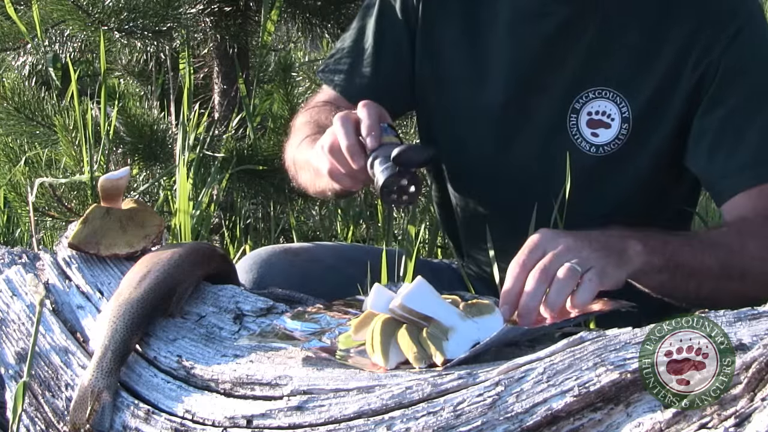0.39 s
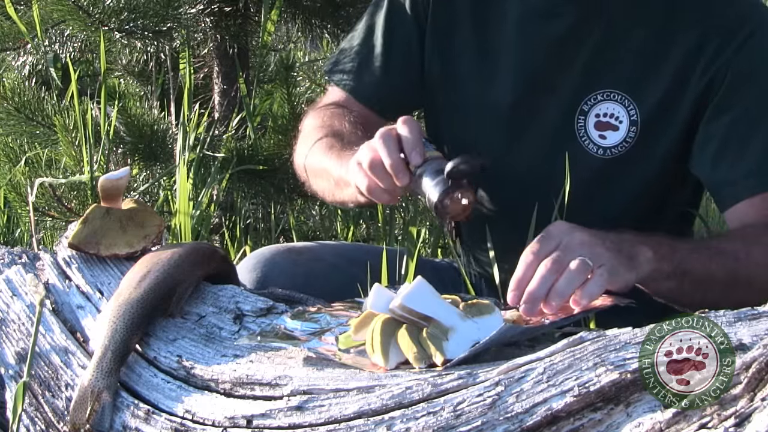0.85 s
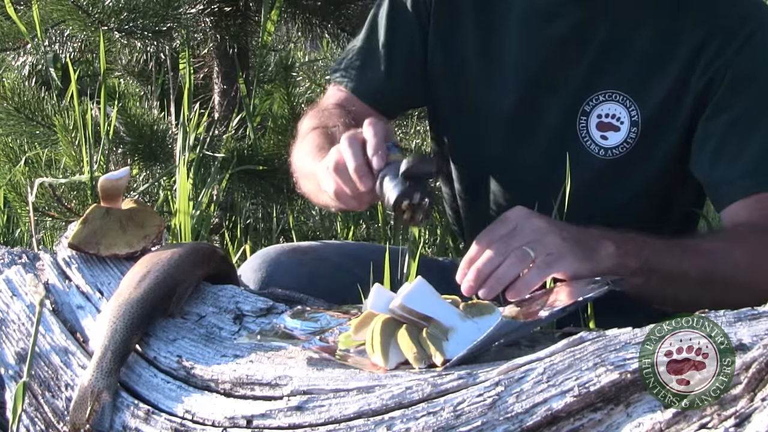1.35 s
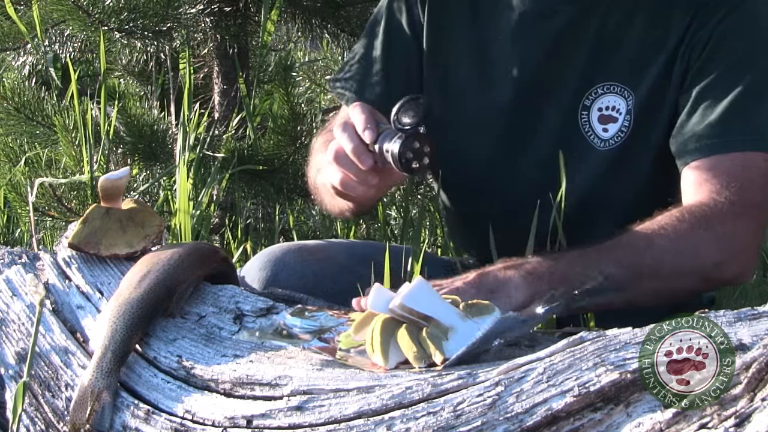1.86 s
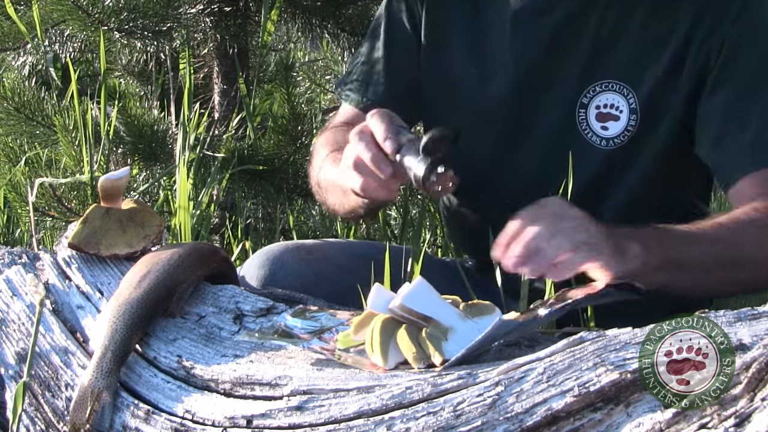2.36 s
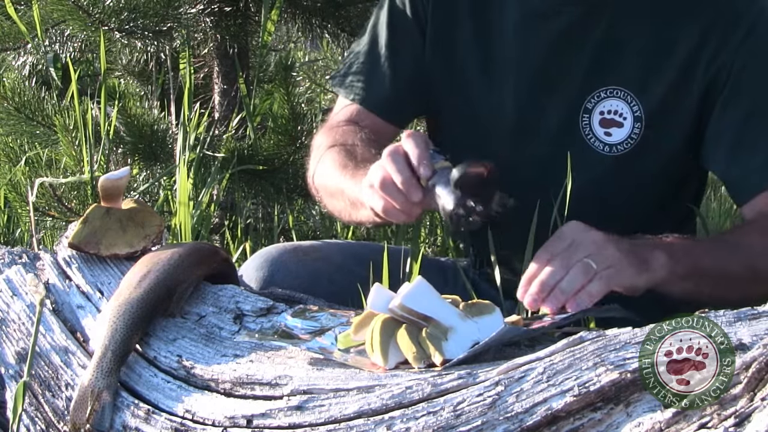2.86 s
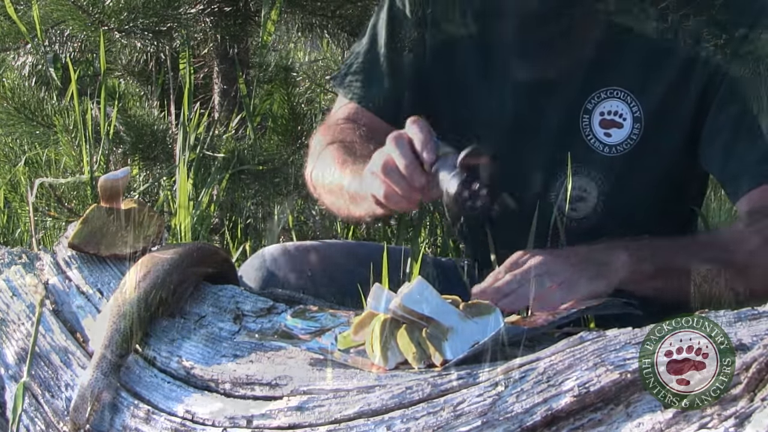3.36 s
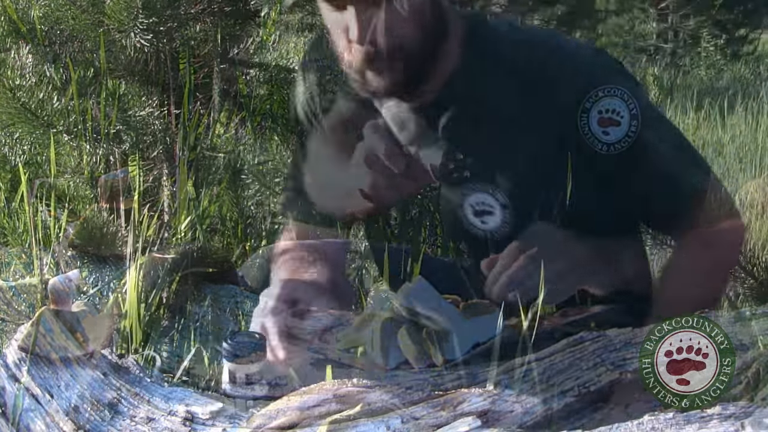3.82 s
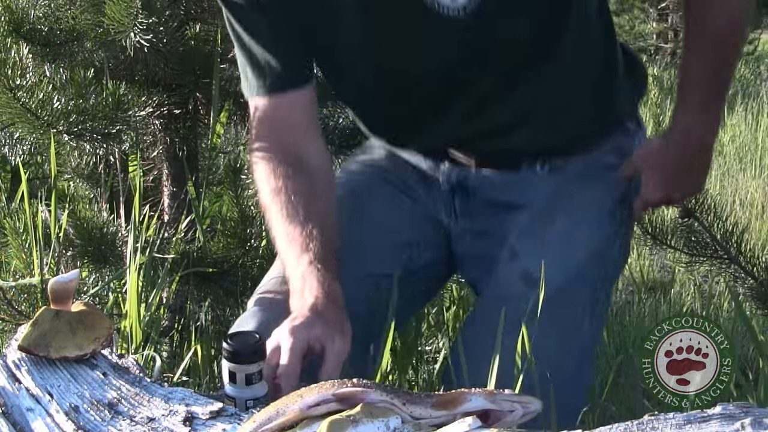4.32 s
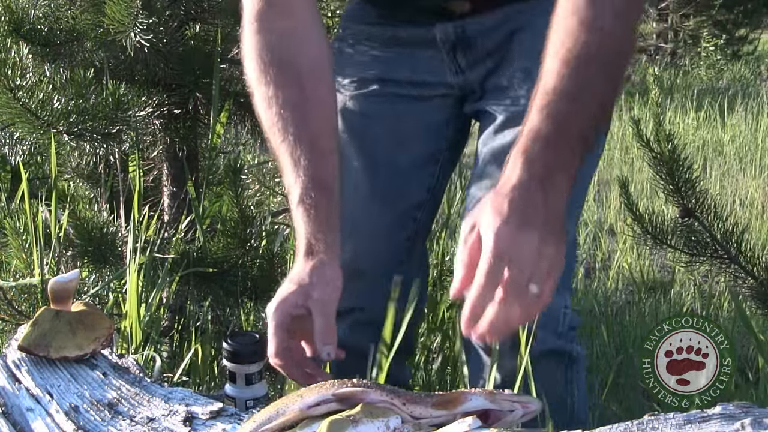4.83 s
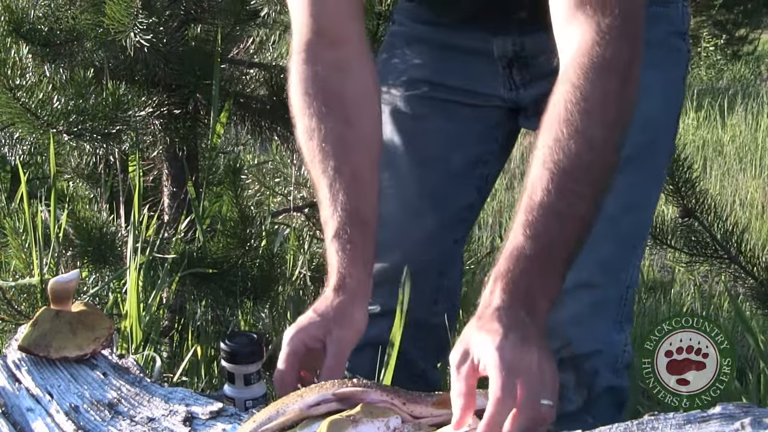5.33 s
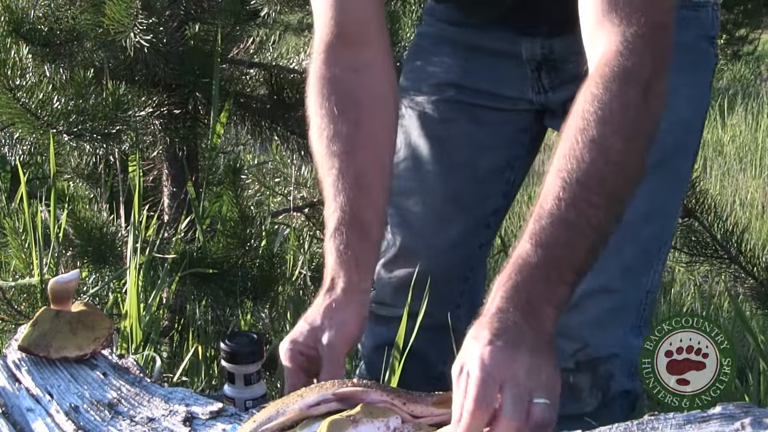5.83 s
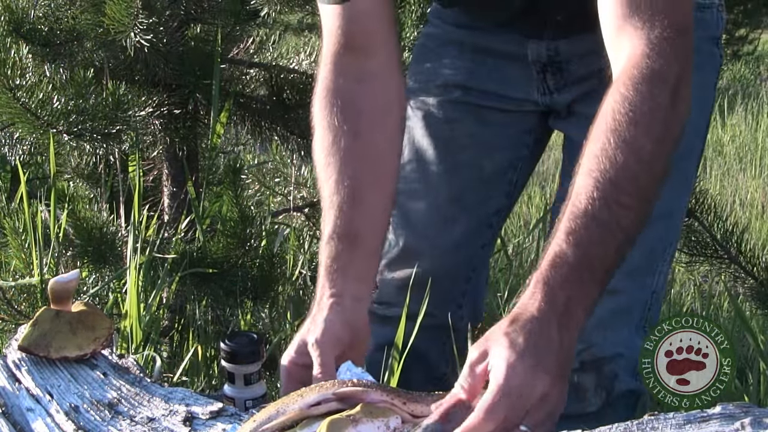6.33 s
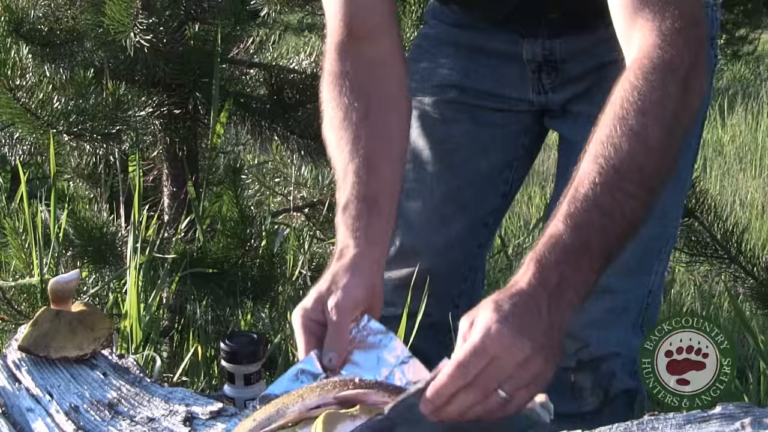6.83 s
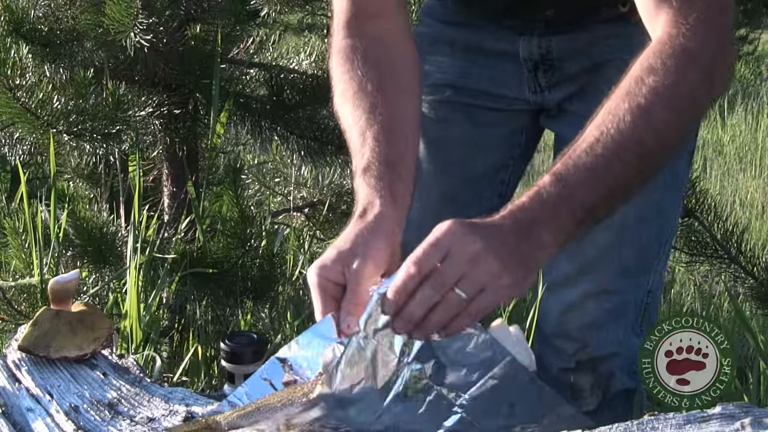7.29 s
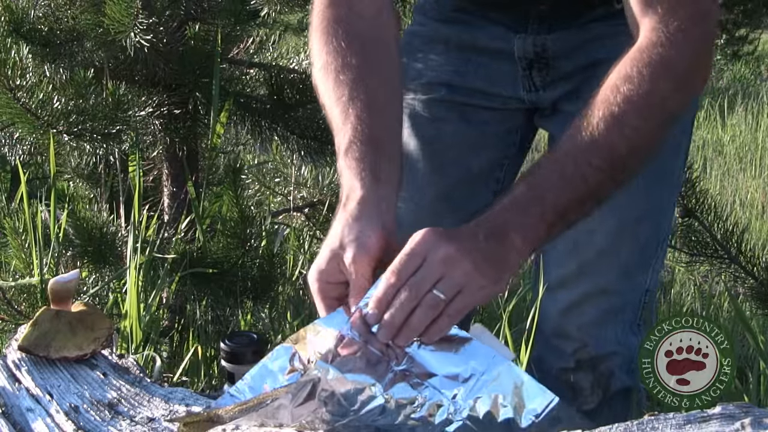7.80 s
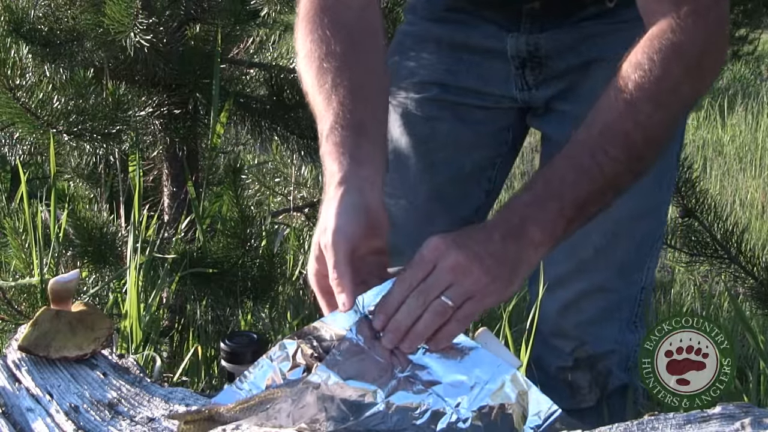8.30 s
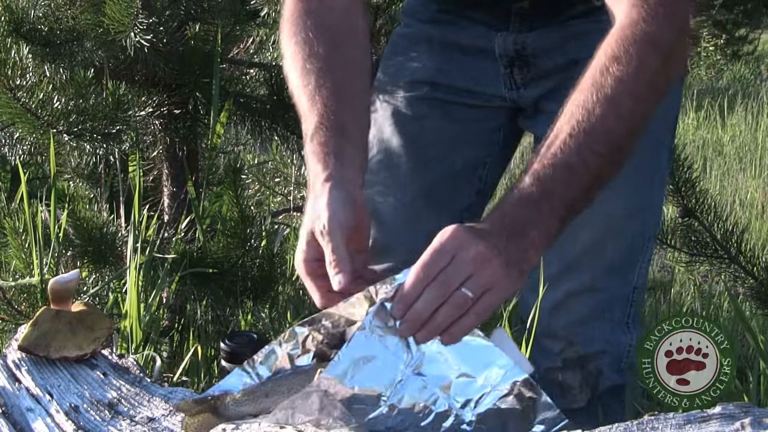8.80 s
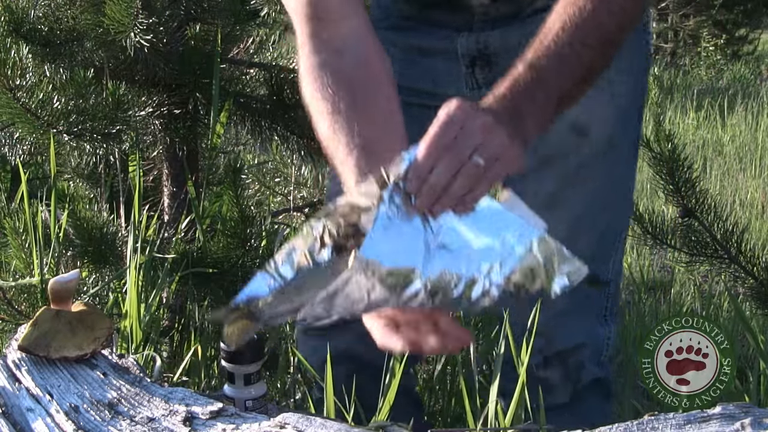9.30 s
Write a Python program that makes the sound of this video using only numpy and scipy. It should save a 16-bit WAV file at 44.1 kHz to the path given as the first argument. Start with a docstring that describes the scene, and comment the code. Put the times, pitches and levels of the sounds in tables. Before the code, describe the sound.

Bright foil crackle, a brief lull of scuffing feet and soft ground thuds, then denser, hollower foil crumpling, with a faint stream behind.

```python
"""Hands handle aluminium foil on a log outdoors: first the sheet lies flat, its creases snapping in bursts.
From about 3 s it turns gradually into a folded packet; someone gets up, steps round the log and lands softly.
Then the foil crackles on as a packet, with small pops, and after 7.7 s it sounds more like a hollow cavity.
The foil is noise shaped by many snaps, the pops and thuds are short rings, the scuffs are lumpy noise.
A stream hisses far off all along, and loud treble pushes soft low bumps out of the microphone input."""
import sys
import numpy as np
from scipy import signal
from scipy.fft import rfft, irfft, next_fast_len
from scipy.io import wavfile
from scipy.ndimage import uniform_filter1d, map_coordinates

SR = 44100
rng = np.random.default_rng(int(sys.argv[2]) if len(sys.argv) > 2 else 0)


def generate_wav(sig):
    """Save sig (samples, or channels by samples) to the path in sys.argv[1] as 16-bit PCM at SR."""
    pcm = np.round(np.clip(np.atleast_2d(sig).T, -1, 1) * 32767).astype(np.int16)
    wavfile.write(sys.argv[1], SR, pcm)


def nominal_scale(level):
    """Amplitude ratio for a level in decibels (scalar or array-like)."""
    x = np.asarray(level, float) / 20
    return 10 ** x


N = 415289  # samples, about 9.4 s

# How deep the sheet sounds, relative to the crackle: time_s, hollow_flexing_db, slapping_on_log_db
HAND_DEPTH = [(0, -10.5, -16.5), (0.67, -16.5, -26), (1.46, -16, -24), (1.7, -9.5, -13.5),
              (2.218, -10.5, -15), (2.8, -16.5, -25), (3.37, -13.5, -21), (3.5, -10.5, -17),
              (4.002, -13, -12.5), (5.2, -15, -16), (6.14, -10.5, -20), (7.37, -4, -14), (7.8, -7, -18.5),
              (8.2, -14, -24), (8.69, -10, -22.5), (9.42, 1, -11)]
# Single loud snaps, levels before the foil weights them: time_s, level_db, brightest_hz
LOUD_SNAPS = [(0.3507, -11.5, 8700), (0.3933, -16, 11600), (0.4248, -18.5, 4440), (0.44, -18.5, 4450),
              (0.4941, -18.5, 5300), (0.464, -22, 8500), (0.5881, -16, 12300), (0.6084, -23.5, 2200),
              (0.622, -15, 13500), (0.6449, -17.5, 12180), (0.8614, -25, 12300), (0.9305, -22, 13600),
              (0.9577, -17, 11060), (0.9941, -15.5, 8000), (1.0064, -15, 8300), (1.085, -16, 12900),
              (1.1626, -20, 8800), (1.2416, -21, 5570), (1.257, -19.5, 10600), (1.291, -15.5, 4300),
              (1.3972, -24.5, 2730), (1.462, -20, 11460), (1.74, -25.5, 12900), (1.847, -14, 13500),
              (2.0854, -11, 10600), (2.158, -17.5, 14500), (2.268, -24, 10970), (2.287, -17.5, 14040),
              (2.3376, -30, 5900), (2.356, -27, 5040), (2.4154, -17.5, 10500), (2.676, -19.5, 14000),
              (2.7302, -17.5, 13470), (2.754, -19, 13000), (2.895, -13, 13600), (2.9835, -18.5, 7600),
              (3.0694, -19.5, 12800), (3.1942, -17, 15100), (3.466, -23.5, 8470), (3.504, -16.5, 5300),
              (3.518, -19, 14100), (3.536, -21, 13600), (4.452, -32, 11400), (4.971, -19, 12200),
              (5.0234, -23, 10000), (5.2652, -23, 12000), (5.436, -23.5, 13600), (5.4438, -32, 9900),
              (5.478, -30, 4570), (5.501, -31, 10000), (5.559, -24.5, 6470), (5.57, -23.5, 9400),
              (5.5996, -20, 8850), (5.618, -29, 6050), (5.668, -24.5, 8900), (5.703, -25.5, 4960),
              (5.7454, -21, 7400), (5.795, -13.5, 9300), (5.8249, -13, 4970), (5.862, -12, 7540),
              (5.9634, -24, 8600), (6.001, -25.5, 4630), (6.0394, -23, 4720), (6.231, -11, 7650),
              (6.3717, -27.5, 7000), (6.3838, -16, 7460), (6.4696, -14.5, 7500), (6.4986, -19, 9900),
              (6.5609, -22.5, 4400), (6.569, -19, 12900), (6.625, -21.5, 7900), (6.665, -19, 7500),
              (6.6724, -25, 7200), (6.6862, -16, 7200), (6.706, -17.5, 9100), (6.7502, -19, 13700),
              (6.793, -21.5, 8900), (6.8384, -17, 7400), (6.89, -19, 13700), (6.909, -20.5, 4330),
              (6.9464, -14.5, 13300), (7.009, -17, 14000), (7.1834, -19.5, 4800), (7.2112, -15.5, 14800),
              (7.2822, -20, 6500), (7.389, -23, 11800), (7.412, -21, 5600), (7.487, -23, 3660),
              (7.839, -27, 10900), (7.8835, -22.5, 8700), (7.907, -17.5, 11400), (7.9384, -20, 8640),
              (8.0367, -26, 11700), (8.0573, -19.5, 5400), (8.117, -16.5, 8740), (8.1298, -20, 5930),
              (8.1508, -16.5, 6150), (8.214, -19, 11500), (8.221, -21, 11900), (8.2468, -18, 9700),
              (8.539, -26.5, 8700), (8.6652, -16, 5900), (8.722, -17.5, 4060), (8.741, -18, 11700),
              (8.863, -25, 9100), (8.9324, -19, 9400), (8.961, -23, 12200), (9.017, -27, 10600),
              (9.077, -22, 9200), (9.1226, -19, 4260)]
# Each grip, press or brush sets off small snaps, before weighting: start_s, length_s, level_db, change_db
CRACKLE_BURSTS = [(0.036, 0.11, -42.5, -1.5), (0.19, 0.012, -43, 4.5), (0.288, 0.079, -43, 5),
                  (0.428, 0.12, -33, -2.5), (0.594, 0.16, -35, -8), (0.847, 0.11, -40, -6),
                  (0.95, 0.11, -35, -5.5), (1.064, 0.14, -51, 10), (1.353, 0.061, -47.5, -3),
                  (1.535, 0.14, -38, -13), (1.862, 0.02, -26.5, 4), (1.891, 0.047, -32.5, -0.5),
                  (1.958, 0.03, -24.5, -0.5), (2.115, 0.16, -32.5, -6), (2.419, 0.025, -39.5, -4),
                  (2.684, 0.0064, -26, -6), (2.751, 0.045, -31, -4.5), (2.843, 0.097, -33, -7),
                  (2.986, 0.045, -36.5, 1), (3.07, 0.057, -42, 3.5), (3.284, 0.023, -32, -5.5),
                  (3.36, 0.044, -40, 0.5), (3.526, 0.029, -26.5, -1), (3.72, 0.19, -42, -5.5),
                  (3.943, 0.028, -45, 2.5), (4.004, 0.054, -45.5, 4), (4.153, 0.08, -45.5, -3),
                  (4.811, 0.076, -41.5, 3), (4.927, 0.016, -32, 2), (5.005, 0.11, -34.5, -3.5),
                  (5.353, 0.0083, -45.5, 3), (5.605, 0.012, -38.5, 3.5), (5.654, 0.045, -41.5, -5),
                  (5.753, 0.19, -35.5, -4), (6.01, 0.17, -37.5, -7), (6.138, 0.098, -40, 12.5),
                  (6.387, 0.063, -37, -6.5), (6.482, 0.065, -35.5, 0), (6.582, 0.07, -41, 2),
                  (6.667, 0.3, -33.5, -22), (6.805, 0.23, -36, -1), (7.044, 0.046, -39, 6.5),
                  (7.411, 0.23, -33, -9.5), (7.676, 0.046, -32.5, -2), (7.83, 0.09, -38.5, -0.5),
                  (7.97, 0.24, -36.5, -10), (8.157, 0.12, -35.5, -13), (8.432, 0.028, -49, 8.5),
                  (8.55, 0.14, -38, -0.5), (8.676, 0.082, -34.5, -3), (8.827, 0.09, -41, 5)]
# Faint rustle between the bursts, before weighting: time_s, level_db
FAINT_RUSTLE = [(0, -56), (1.3, -41.5), (1.7, -51.5), (2.3, -45.5), (2.6, -49), (3.7, -46), (4.3, -49.5),
                (4.5, -54), (4.75, -48.5), (5.3, -48), (6.33, -48), (7.2, -41.5), (8.3, -48), (9.1, -50),
                (9.3, -61)]
# How much of the rustle is separate snaps; cloth and grass brush smoothly: time_s, share_0_to_1
SNAP_SHARE = [(0, 0.89), (3.66, 0.87), (3.72, 0.2), (5.15, 0.55), (5.56, 0.96), (9.14, 1), (9.3, .4)]
# How bright the rustle is, tilted around 8 kHz: time_s, tilt_db_per_octave
RUSTLE_TILT = [(0, -0.5), (.9, -0.5), (1.7, -1), (1.9, -2), (2.5, 1), (3.4, 0), (3.7, -2.5), (4.05, 1),
               (4.12, -7.5), (4.3, -5.5), (4.6, -3.5), (4.9, -2.5), (5.2, -2), (7.2, -5), (8.3, -2.5),
               (9.0, -5.5), (9.42, -7)]
# Colour of the flat sheet: pitch_hz, level_db_per_hz (relative)
FLAT_COLOUR = [(120, -55), (200, -3.5), (481, 3.5), (537, -6), (1390, -2.5), (3050, -4.5), (4390, -1.5),
               (6810, -2.5), (13200, 3), (15800, 2)]
# Colour of the folded packet: pitch_hz, level_db_per_hz (relative)
PACKET_COLOUR = [(120, -14), (200, -12), (346, -3), (577, -7), (912, -3), (1520, -6), (2940, -14.5),
                 (4810, -5.5), (6570, -5.5), (8000, -4.5), (10600, -1.5), (13600, -2), (15800, -0.5)]
# The foil heard again off the log and, inverted, off the microphone housing:
# time_s, log_extra_path_s, log_strength_0_to_1, housing_strength_0_to_1
BOUNCES = [(3.4, 0.00011, 0, 0), (5.2, 0.00011, 0.2, 0.07), (5.7, 0.00014, 0.2, 0.07),
           (6.7, 0.00014, 0.36, 0), (6.85, 0.00022, 0.28, 0), (7.15, 0.00022, 0.25, 0.05),
           (7.4, 0.00028, 0, 0.28), (7.8, 0.00034, 0.3, 0), (9.4, 0.00034, 0.1, 0)]
# Dents in the sheet popping through, and small knocks on the log, before a boost: time_s, level_db, pitch_hz
DENT_POPS = [(1.615, -45, 900), (1.634, -38, 1080), (1.646, -30.5, 870), (1.926, -14.5, 1360),
             (1.957, -19, 490), (2.358, -37, 1530), (3.517, -19.5, 607), (3.5235, -18, 690),
             (3.524, -12, 1390), (3.535, -17, 1394), (4.311, -26, 780), (4.333, -40, 764),
             (4.356, -36, 790), (4.372, -40, 970), (4.387, -43, 590), (4.942, -21, 550), (5.023, -29, 840),
             (5.702, -28.5, 1170), (6.031, -33, 875), (6.091, -29, 1060), (6.199, -27, 1280),
             (6.227, -19, 645), (7.05, -18, 930), (7.21, -21.5, 945), (7.357, -23.5, 875),
             (7.391, -19, 855), (7.669, -12.5, 790), (7.907, -18.5, 950), (7.963, -17, 870),
             (8.025, -28, 1160), (8.06, -25, 1490), (8.134, -25, 1410), (8.402, -25.5, 1480),
             (8.673, -21.5, 710), (8.7, -15, 1400), (8.819, -25, 1130), (8.869, -20, 1330),
             (8.962, -25, 1050), (8.994, -31, 1690)]
# Knees and feet on soft ground, before a boost: time_s, level_db, pitch_hz
GROUND_THUDS = [(3.518, -23, 284), (3.733, -26, 73), (3.768, -26, 101), (3.878, -27, 108), (4.031, -28, 80),
                (4.192, -26.5, 104), (4.946, -18, 184), (4.967, -21, 81), (4.952, -22, 417),
                (5.03, -19, 333), (5.078, -21, 230)]
# Getting up and stepping round the log: time_s, level_db
SHUFFLE_LEVEL = [(3.66, -53), (3.73, -51.5), (4.14, -40.5), (4.24, -36.5), (4.3, -43), (4.37, -38.5),
                 (4.47, -49.5), (4.85, -53), (5.0, -38), (5.12, -45), (5.4, -56)]
# A boot drags as it lands: time_s, level_db
BOOT_DRAGS = [(4.939, -37), (5.031, -37)]
# Colour of the scuffing: pitch_hz, level_db_per_hz (relative)
SCUFF_COLOUR = [(35, -30), (60, 13), (183, -8), (301, -13.5), (550, -7), (1350, -13), (2000, -47),
                (2600, -57), (4400, -120)]
# Colour of the distant water: pitch_hz, level_db_per_hz (relative)
STREAM_COLOUR = [(60, 8.5), (600, -2), (1200, 1.5), (2000, -3), (3000, -11.5), (7000, -26), (15000, -41)]

BANDS_HZ = 180 * 2 ** np.arange(0, 6.7, 1 / 4)  # quarter-octave steps
HOLLOW_FROM_HZ, CRACKLE_FROM_HZ = 550, 2200  # slapping lies below both
BAND_GROUP = np.digitize(BANDS_HZ, [HOLLOW_FROM_HZ, CRACKLE_FROM_HZ])  # 0 slap, 1 hollow, 2 crackle
FOLD_START_S, FOLD_LENGTH_S = 2.97, 2.6
CRUSH_DB = -27.5  # around this level and above, the small snaps crowd into a roar
RISE_DB_PER_S, FALL_DB_PER_S = 432, 393  # how fast each burst swells and dies
CLOSED_S, CAVITY_HZ, CAVITY_DB, CAVITY_OCTAVES = 7.72, 1350, 8, 0.18  # the crimped packet as a cavity
HOUSING_DELAY_S = 0.000306
BOOT_DRAG_S = 0.011
STREAM_DB = -54


def foil():
    """Each snap shakes all bands of the sheet at once but unevenly; many small snaps, few large."""
    t = np.arange(N) / SR
    crackle = bursts(t)
    time_s, hollow, slap = np.transpose(HAND_DEPTH)
    slap_db, hollow_db = np.interp(t, time_s, slap), np.interp(t, time_s, hollow)
    grain = np.clip(np.interp(t, *np.transpose(SNAP_SHARE)), 0, 1)
    grain = grain / (1 + crackle / nominal_scale(CRUSH_DB) ** 2)
    tilt_db = np.interp(t[::64], *np.transpose(RUSTLE_TILT))
    snaps = draw_small_snaps()
    # buckling comes in sharp spikes, so the shaking is far from even
    shake = rng.standard_normal(N) * np.exp(.5 * rng.standard_normal(N))
    shake /= shake.std()
    folded = np.clip((t - FOLD_START_S) / FOLD_LENGTH_S, 0, 1)
    spectrum = 0
    for hz, g, flat, packet in zip(BANDS_HZ, BAND_GROUP, band_shares(FLAT_COLOUR), band_shares(PACKET_COLOUR)):
        small = small_snaps(snaps, hz, g, grain)
        lean = np.repeat(nominal_scale(tilt_db * np.log2(hz / 8000)) ** 2, 64)[:N] if g == 2 else 1
        depth = nominal_scale((slap_db, hollow_db, 0)[g]) ** 2
        power = depth * (crackle * lean * small + loud_snaps(hz, g))
        cavity_db = CAVITY_DB * np.exp(-(np.log2(hz / CAVITY_HZ) / CAVITY_OCTAVES) ** 2)
        power = power * nominal_scale((t > CLOSED_S) * cavity_db) ** 2
        share = flat + (packet - flat) * folded
        spectrum = spectrum + slice_of(shake * np.sqrt(power * share), hz)
    shaken = irfft(spectrum, next_fast_len(N))[:N]
    # the freed facet pings at the colour of its snap
    pings = rings(LOUD_SNAPS, boost_db=2.0, fall_turns=2.55, soft_turns_per_db=0.5, under_db=-13.5)
    return shaken + pings


def bursts(t):
    """Power of the crackle: every burst swells, holds and dies away at the same pace, over a faint rustle."""
    start_s, length_s, db, change_db = np.transpose(CRACKLE_BURSTS)[:, :, None]
    coarse_t = t[::64]
    age_s, length_s = coarse_t - start_s, np.maximum(length_s, .001)
    edges_db = RISE_DB_PER_S * np.minimum(age_s, 0) - FALL_DB_PER_S * np.maximum(age_s - length_s, 0)
    level_db = db + change_db * np.clip(age_s / length_s, 0, 1) + edges_db
    power = (nominal_scale(level_db) ** 2).sum(axis=0)
    rustle = nominal_scale(np.interp(t, *np.transpose(FAINT_RUSTLE))) ** 2
    return np.interp(t, coarse_t, power) + rustle


def draw_small_snaps():
    """Small snaps fall at random moments, mostly weak, each with its own pitch and onset."""
    when, size, pitch, kind = rng.random((2600, 4)).T
    power = nominal_scale(np.minimum(-5.0 * np.log(size), 13.0)) ** 2
    brightest_hz = 8000 * 2 ** (2.4 * (pitch - .5))
    return when * N / SR, power, brightest_hz, kind < .65  # the last marks the sudden ones


def small_snaps(snaps, hz, group, grain):
    """Small creases give way in one band: most crack at once, the rest build up as a crease runs."""
    time_s, power, brightest_hz, sudden = snaps
    fall_s = 0.002 * (6000 / hz) ** 0.054
    each = power * around(hz, group, brightest_hz, 1.0)
    each = each * nominal_scale(5.34 * rng.standard_normal(len(power))) ** 2
    dense = fade(time_s, each * sudden, 0.0001, fall_s)
    dense = dense + fade(time_s, each * ~sudden, 0.00031, 0.57 * fall_s)
    # the sudden ones open with a bare tick
    dense = dense + nominal_scale(6.0) ** 2 * fade(time_s, each * sudden, 0.00004, 0.00015)
    # loudness is evened out over about 80 ms, so the rustle keeps the level set by the bursts
    even = dense / uniform_filter1d(dense + 1e-9, int(.08 * SR))
    return grain * even + 1 - grain


def loud_snaps(hz, group):
    """In one band, a loud snap cracks, then the sheet rattles on more softly."""
    time_s, db, brightest_hz = np.transpose(LOUD_SNAPS)
    after = np.arange(SR // 30)
    age_s = after / SR
    crack = (1 - np.exp(-age_s / 0.0001)) * np.exp(-age_s / 0.0016)
    rattle = nominal_scale(-16) ** 2 * np.exp(-age_s / 0.0034)
    uneven_db = 2.04 * rng.standard_normal(len(time_s))
    peak = nominal_scale(db + (-11.0, -9.0, -7.0)[group] + uneven_db) ** 2 * around(hz, group, brightest_hz, 1.17)
    places = (time_s[:, None] * SR).astype(int) + after
    return np.bincount(places.ravel(), (peak[:, None] * (crack + rattle)).ravel(), N)[:N]


def around(hz, group, centre_hz, db):
    """A crackle band gets weaker the farther it lies from a snap's brightest pitch; deeper bands do not."""
    return nominal_scale(-db * np.log2(hz / centre_hz) ** 2) ** 2 if group == 2 else 1


def band_shares(table):
    """How the sheet divides its power among the bands; each of the three groups adds up to 1."""
    power = nominal_scale(colour(table, BANDS_HZ)) ** 2 * BANDS_HZ
    return power / np.bincount(BAND_GROUP, power)[BAND_GROUP]


def echoed(x):
    """Direct sound plus two bounces; together they cancel in combs of dips, one moving with the hands."""
    time_s, lag_s, log, housing = np.transpose(BOUNCES)
    n = np.arange(N)
    t = n / SR
    late = lambda delay_s: map_coordinates(x, [n - SR * delay_s], order=3)
    off_log = np.interp(t, time_s, log) * late(np.interp(t, time_s, lag_s))
    off_housing = np.interp(t, time_s, housing) * late(HOUSING_DELAY_S)
    return x + off_log - off_housing


def pops():
    """Dents popping through and knocks on the log ring for a moment."""
    return rings(DENT_POPS, boost_db=6.0, fall_turns=0.72, soft_turns_per_db=0.23, under_db=-9.5)


def thuds():
    """Knees and feet push soft ground, which swings and dies within a few cycles."""
    return rings(GROUND_THUDS, boost_db=3.5, fall_turns=0.44, soft_turns_per_db=0, under_db=-5.5)


def shuffle():
    """Feet and cloth scuff the ground in lumps; each band lurches on its own."""
    out, lurch = 0, walk(25.24)
    for hz in 70 * 2 ** np.arange(0, 5, .5):
        level_db = colour(SCUFF_COLOUR, hz) + 2.4 * lurch + 6.4 * walk(30)
        out = out + nominal_scale(level_db) * band(rng.standard_normal(N), hz, 0.45)
    t = np.arange(N) / SR
    level_db = np.interp(t, *np.transpose(SHUFFLE_LEVEL), left=-99, right=-99)
    drags = sum(nominal_scale(db) * np.exp(-((t - s) / BOOT_DRAG_S) ** 2) for s, db in BOOT_DRAGS)
    return out / out.std() * (nominal_scale(level_db) + drags)


def stream():
    """Distant water: bands of hiss that swell together and flicker alone."""
    out, swell = 0, walk(1.0)
    for hz in 60 * 2 ** np.arange(0, 8.2, .5):
        level_db = colour(STREAM_COLOUR, hz) + 1.0 * swell + 1.0 * walk(5.7)
        out = out + nominal_scale(level_db) * band(rng.standard_normal(N), hz, 0.42)
    return out / out.std() * nominal_scale(STREAM_DB)


def rings(table, boost_db, fall_turns, soft_turns_per_db, under_db):
    """A push swells briefly and rings out, a lower and a higher mode beside it; soft ones may ring longer."""
    out = np.zeros(N + SR)
    for (s, db, hz), (low, high) in zip(table, rng.random((len(table), 2))):
        fall = fall_turns + soft_turns_per_db * max(-25 - db, 0)
        turns = np.arange(int(8 * fall * SR / hz)) / SR * hz  # cycles since the push
        low_mode = np.sin(2 * np.pi * (0.44 + 0.36 * low) * turns)
        high_mode = np.sin(2 * np.pi * (1.42 + .5 * high) * turns)
        tone = np.sin(2 * np.pi * turns) + nominal_scale(under_db) * (low_mode + high_mode)
        swell = turns / fall * np.exp(-turns / fall)
        out[int(s * SR):][:len(turns)] += nominal_scale(db + boost_db) * swell * tone
    return out[:N]


def fade(at_s, power, rise_s, fall_s):
    """Power envelope: a quick rise and an exponential fall from each moment."""
    env = np.bincount(np.clip((at_s * SR).astype(int), 0, N - 1), power, N)
    up, down = np.exp(-1 / (rise_s * SR)), np.exp(-1 / (fall_s * SR))
    return signal.lfilter([1 - up], np.convolve([1, -up], [1, -down]), env)


def slice_of(x, hz):
    """Spectrum of one band with soft edges; white noise keeps its level."""
    size = next_fast_len(N)
    bin_hz = np.maximum(np.arange(size // 2 + 1), 1) * SR / size
    away = 4 * np.log2(bin_hz / hz)  # quarter octaves
    shape = np.cos(np.pi / 2 * np.clip(away, -1, 1)) ** 2
    return rfft(x, size) * shape / np.sqrt(np.mean(shape ** 2))


def band(x, hz, octaves):
    """A band-pass keeps only the sound around one pitch."""
    edges = hz * 2 ** (np.array([-.5, .5]) * octaves)
    return signal.sosfilt(signal.butter(2, np.minimum(edges, .49 * SR), "band", fs=SR, output="sos"), x)


def colour(table, hz):
    """Level in dB that a spectrum table gives at a pitch, read along a logarithmic pitch scale."""
    f, db = np.transpose(table)
    return np.interp(np.log(hz), np.log(f), db)


def walk(rate):
    """Random levels, rate of them a second, smoothed twice so they glide; spread near 1."""
    k = int(SR / rate)
    held = np.repeat(rng.standard_normal(N // k + 1), k)
    return 1.3 * uniform_filter1d(uniform_filter1d(held, k), k)[:N]


def scene():
    """Foil, movement and water add up at one microphone."""
    return (echoed(foil()) + pops() + thuds() + shuffle() + stream())[None]


def low_pass(x):
    """Removes everything above the highest recorded frequency."""
    return signal.sosfilt(signal.butter(12, 16820, fs=SR, output="sos"), x)


def record(dry):
    """The input shifts with the rectified treble; the low cut turns each shift into a bump; the top is cut."""
    treble = signal.sosfilt(signal.butter(2, 2500, "high", fs=SR, output="sos"), dry)
    shift = nominal_scale(6.0) * signal.sosfilt(signal.butter(1, 40, fs=SR, output="sos"), np.abs(treble))
    shifted = dry + shift - shift.mean()
    low_cut = signal.sosfilt(signal.butter(4, 27, "high", fs=SR, output="sos"), shifted)
    mix = signal.sosfilt(signal.ellip(10, .2, 70, 15730, fs=SR, output="sos"), low_cut)
    return low_pass(mix)


dry = scene()
out = record(dry)
generate_wav(out)
```